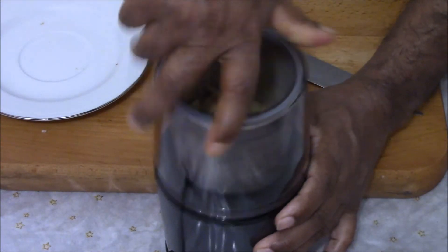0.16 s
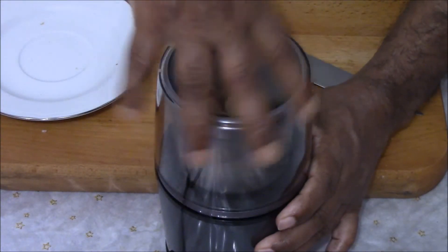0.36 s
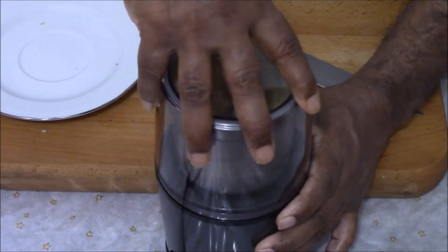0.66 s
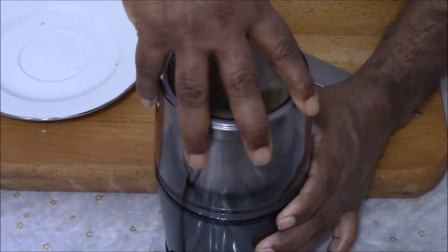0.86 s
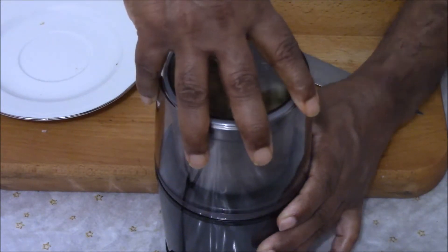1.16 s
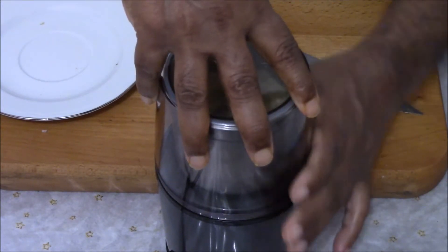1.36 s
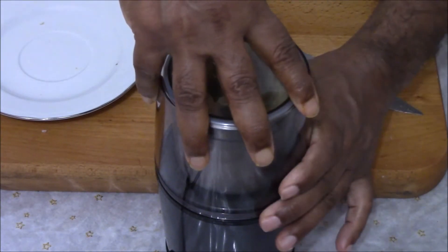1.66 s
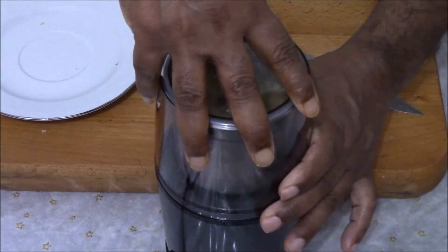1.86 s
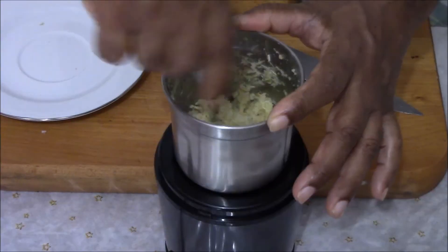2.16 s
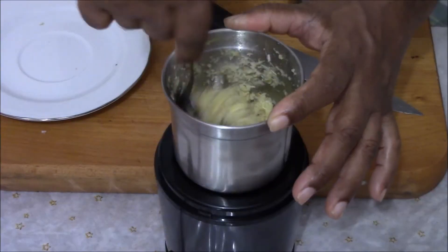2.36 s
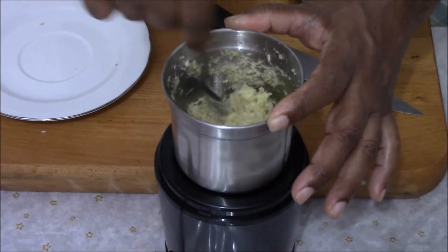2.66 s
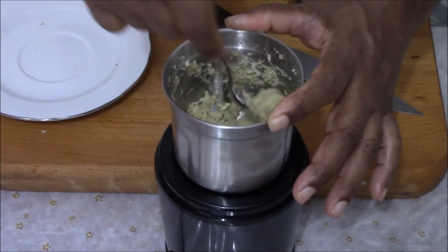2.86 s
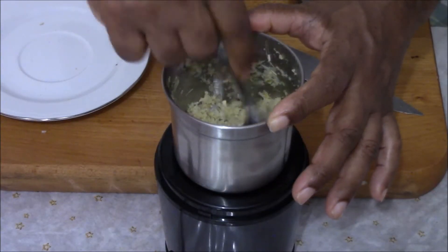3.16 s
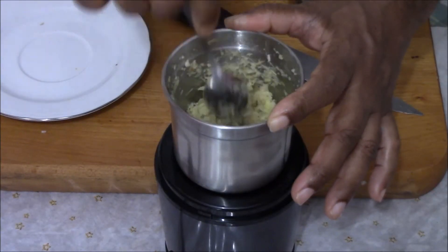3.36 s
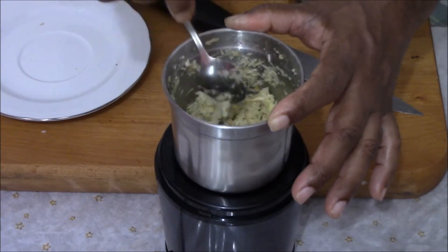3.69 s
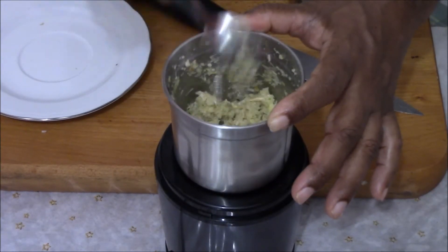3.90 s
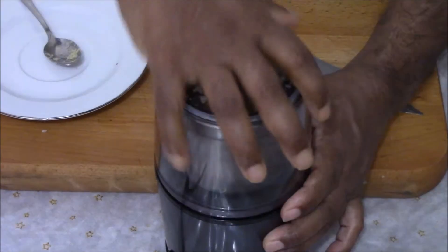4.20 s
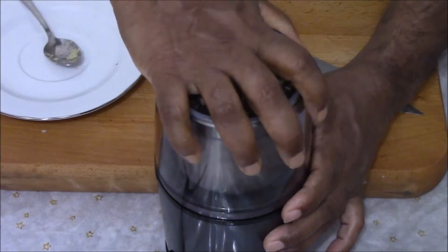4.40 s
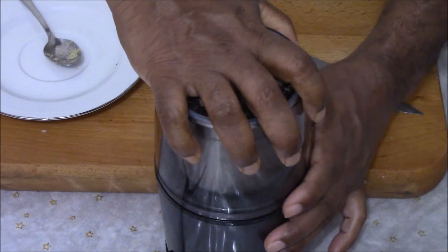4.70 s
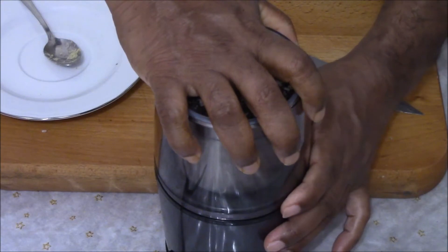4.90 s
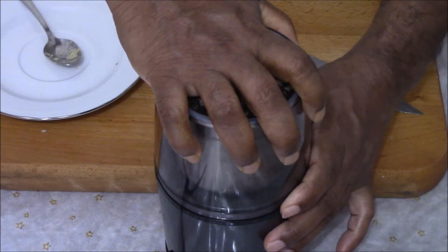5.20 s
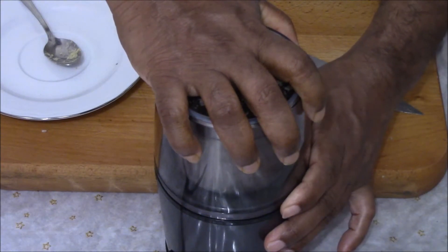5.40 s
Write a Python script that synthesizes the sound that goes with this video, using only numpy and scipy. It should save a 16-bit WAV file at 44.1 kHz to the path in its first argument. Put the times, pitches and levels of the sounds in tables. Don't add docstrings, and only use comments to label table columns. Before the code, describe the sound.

In a hard kitchen, a small electric grinder chops loudly, a spoon taps and scrapes metal, lands on a plate, then wet paste grinds quietly.

```python
import sys
import numpy as np
from scipy import signal
from scipy.fft import rfft, irfft, next_fast_len
from scipy.io import wavfile
from scipy.ndimage import uniform_filter1d, map_coordinates

SR = 44100
rng = np.random.default_rng(int(sys.argv[2]) if len(sys.argv) > 2 else 0)


def volts_from_decibels(level):
    exponent = np.asarray(level, float) / 20
    return 10 ** exponent


def materialize(psi):
    bounded = np.clip(np.atleast_2d(psi).T, -1, 1)
    quanta = np.round(bounded * 32767).astype(np.int16)
    wavfile.write(sys.argv[1], SR, quanta)


N = 244443
T = np.arange(N) / SR
TOP_HZ = 16150


def unit(x):
    return x / np.sqrt(np.mean(x ** 2) + 1e-20)


def along(points, hz):
    f, v = np.transpose(points)
    return np.interp(np.log(hz + 1), np.log(f + 1), v)


def curves(rows):
    s, *cols = np.transpose(rows)
    gate = uniform_filter1d(1. * (T > s[0]) * (T < s[-1]), size=200)
    return [np.interp(T, s, c) for c in cols] + [gate]


def wobble(rate):
    return map_coordinates(rng.standard_normal(int(N * rate / SR) + 4), [T * rate])


def filtered(x, response):
    m = next_fast_len(x.shape[-1] + SR // 4)
    return irfft(rfft(x, m) * response(np.fft.rfftfreq(m, 1 / SR)), m)[..., :x.shape[-1]]


def peak(f, hz, width):
    return 1j * f * width / (hz * hz - f * f + 1j * f * width)


def ringing(x, modes, spectrum, lo, hi, between_db):
    middle_db = along(spectrum, np.sqrt(lo * hi))

    def response(f):
        edge = 1 / np.sqrt((1 + (lo / (f + 1)) ** 12) * (1 + (f / hi) ** 12))
        lines = sum(volts_from_decibels(db) * peak(f, hz, max(w, hz / 60)) for hz, w, db in modes)
        return edge * (lines + volts_from_decibels(between_db + along(spectrum, f) - middle_db))

    return unit(filtered(x, response))


def grit(per_second, spread_db, share):
    draw = rng.random(N)
    sizes = volts_from_decibels(spread_db * rng.standard_normal(N)) * rng.choice([-1, 1], N)
    hits = (draw < per_second / SR) * sizes
    share = np.clip(share, 0, 1)
    return np.sqrt(1 - share) * rng.standard_normal(N) + np.sqrt(share) * unit(hits)


def ping(t, hz, db, t60):
    drift = 0.079 * np.cumsum(rng.standard_normal(len(t)))
    return volts_from_decibels(db - 60 * t / t60) * np.sin(2 * np.pi * hz * t + drift)


def add(track, s, sound):
    track[round(s * SR):][:len(sound)] += sound


def stroke(s, db, rise, t60):
    return volts_from_decibels(db - 60 * np.clip(T - s, 0, 2) / t60) * np.clip(1 + (T - s) / rise, 0, 1) ** 2


def strokes(rows):
    return [sum(stroke(s, db + lean * bright, rise, t60) for s, db, rise, t60, bright in rows)
            for lean in (-1, 0, 1)]


# [f/Hz, level/dB]
AIR_MID = [(15, -69), (25, -41), (97, -19), (170, -11.5), (256, -8), (293, -7), (695, -16), (863, -21),
           (8590, -41.5), (16000, -48)]
AIR_SIDE = [(15, -48), (25, -11), (373, -4.5), (818, -15), (3250, -26), (3720, -27.5), (8590, -33),
            (16000, -45)]


def room_tone(level_db):
    air = [unit(filtered(rng.standard_normal(N), lambda f: volts_from_decibels(along(colour, f))))
           for colour in (AIR_MID, AIR_SIDE)]
    return air * volts_from_decibels(level_db + 1.4 * wobble(10.0) + [[0], [-11]])


# [f/Hz, t60/s]
KITCHEN = [(150, 0.52), (1000, 0.55), (4000, 0.47), (8000, 0.36), (14000, 0.18)]


def kitchen(x):
    hz, t, z = signal.stft(rng.standard_normal((2, SR)), SR, nperseg=256)
    tail = signal.istft(z * volts_from_decibels(-60 * t / along(KITCHEN, hz)[:, None]), SR, nperseg=256)[1]
    delayed = np.pad(x, (300, 0))[None]
    return signal.fftconvolve(delayed, tail / np.linalg.norm(tail[0]), axes=1)[:, :len(x)]


# [t/s, peak level/dB, rise/s, t60/s, brightness/dB]
HANDLING = [
    (0.02, -21, 0.09, 0.43, 2.5),
    (0.13, -23, 0.074, 0.29, -8),
    (0.342, -19, 0.0094, 0.14, -5),
    (0.405, -21.5, 0.015, 0.27, 0.5),
    (0.448, -11.5, 0.017, 0.11, 3.5),
]
# [t/s, peak level/dB, click f/Hz, rim level/dB]
CLICKS = [(0.034, -10, 3360, -14), (0.087, -10, 2540, 3.5), (0.113, -10.5, 2370, -1),
          (0.13, -17, 2600, -30), (0.337, -28, 2660, -41), (0.3434, -29, 2560, -34),
          (0.396, -46, 2810, -14), (0.4208, -9, 2900, -9), (0.451, -5, 3760, -21),
          (4.2016, -16.5, 3290, -16), (4.2074, -17, 3130, -31), (4.2251, -19, 3480, -28)]
# [t/s, shell level/dB, thud level/dB]
KNOCKS = [
    (0.035, -27, -13),
    (0.086, -27, -21),
    (0.1287, -23, -13),
    (0.3407, -20.5, -44),
    (0.396, -24, -15),
    (0.4198, -24, -20),
    (0.45, -6.5, -25),
    (4.2264, -23, -22),
]


def fit_lid():
    out, t = np.zeros(N + SR), np.arange(SR // 8) / SR
    for s, db, hz, rim_db in CLICKS:
        contact = volts_from_decibels(-60 * t / 0.019) * (1 - np.exp(-t / 0.00011)) * rng.standard_normal(len(t))
        click = filtered(contact, lambda f: peak(f, hz, 260) + volts_from_decibels(rim_db - 9.0) * peak(f, 7730, 980)
                         + volts_from_decibels(-33) * peak(f, 5000, 12000))
        add(out, s, volts_from_decibels(db) * click / np.abs(click).max())
    for s, shell_db, thud_db in KNOCKS:
        thud = ping(t, 293.0, thud_db - 4.0, 0.088) * (1 - np.exp(-t / 0.0071))
        add(out, s, ping(t, 1068, shell_db, 0.076) + thud)
    pushing, _, sliding = strokes(HANDLING)
    noise = rng.standard_normal(N)
    rumble = pushing * volts_from_decibels(-7.5) * ringing(noise, BODY, AIR_MID, 120, 1800, between_db=-27)
    rasp = ringing(grit(340, 14.0, 0.45), SHELL, CHOP_COARSE, lo=1940, hi=16000, between_db=5)
    return out[:N] + rumble + sliding * volts_from_decibels(-12.0) * rasp


# [f/Hz, width/Hz, level/dB]
BODY = [(103, 8.9, -4.5), (148.9, 4.5, 6), (200, 45, -1), (254.6, 30, -5.5), (278.3, 11, 0.5),
        (330.8, 11.8, 3.5), (387.5, 8.8, -2.5), (636, 58, -20)]
# [f/Hz, width/Hz, level/dB]
SHELL = [(824, 23, -22), (997, 12, -7), (1082, 25, -5), (1297, 18, -5.5), (1428, 64, -6), (1520, 43, -9),
         (1637, 47, -7), (2044, 80, -8.5), (2477, 40, -3.5)]
PULPED_S, PULPING_S, DULLED_DB, SLAP_DB = 1.52, 0.032, 6, -8


def grinder(rows, chop, wall, grains, rough_db, between_db, cup_db, spray_db, finer_db_per_s, lumps_db):
    body_db, flying_db, on = curves(rows)
    finer_db = finer_db_per_s * (T - rows[0][0]) * on
    pulp = 1 / (1 + np.exp(np.clip((PULPED_S - T) / PULPING_S, -50, 50)))
    slap = ringing(rng.standard_normal(N), BODY, chop, lo=430, hi=910, between_db=17)
    slap = pulp * volts_from_decibels(SLAP_DB + 3.3 * wobble(33)) * slap
    load = wobble(21.73)
    body = ringing(rng.standard_normal(N), BODY, chop, lo=99, hi=470, between_db=-7)
    body = volts_from_decibels(body_db + 0.74 * wobble(9) + rough_db * wobble(45)) * body
    shell = ringing(grit(900, 2.2, grains), SHELL, chop, lo=593, hi=2104, between_db=-4.5)
    shell = volts_from_decibels(1.0 * load + 1.6 * wobble(12)) * shell
    strikes = volts_from_decibels(lumps_db * load + 1.6 * wobble(140)) * grit(1400, 5.0, grains)
    cup = volts_from_decibels(cup_db - 0.14 * finer_db) * ringing(strikes, wall, chop, 2570, 6000, between_db)
    spray = ringing(strikes, wall, chop, 7780, 2 * TOP_HZ, between_db - 21)
    spray = volts_from_decibels(spray_db - finer_db - DULLED_DB * pulp) * spray
    return on * volts_from_decibels(-0.5) * (body + volts_from_decibels(flying_db) * (shell + slap + cup + spray))


# [t/s, housing shake level/dB, flying pieces level/dB]
COARSE = [
    (0.45, -14, -15.5),
    (0.58, -11.5, -17),
    (0.86, -13, -16),
    (1.08, -20, -15),
    (1.16, -14, -14.5),
    (1.5, -16.5, -14),
    (1.7, -21, -14),
    (1.79, -18, -17),
    (1.97, -18, -16),
]
# [f/Hz, density level/dB per Hz]
CHOP_COARSE = [(40, -48), (144, -9.5), (329, 6), (680, -14), (1440, -11), (1810, -19), (2050, -13.5),
               (3060, -22), (3650, -18.5), (4240, -26), (7730, -25.5), (16000, -39.5)]
# [f/Hz, width/Hz, level/dB]
CUP = [(3654, 150, 6), (4990, 21, -1), (5500, 250, 0), (7330, 97, 3), (7920, 77, -2), (10830, 180, -9)]


def chop_coarse():
    return grinder(COARSE, CHOP_COARSE, CUP, grains=0.58, rough_db=-0.4, between_db=4.5, cup_db=-5,
                   spray_db=-9.0, finer_db_per_s=3, lumps_db=1.83)


RIM_HZ, SAG_HZ_PER_S, RIM_DB, FADE_DB_PER_S = 3720, 110, -22, 17
# [t/s, peak level/dB]
FITS = [
    (0.624, -11.5),
    (1.25, -11),
    (1.299, -3),
    (1.34, -10.5),
    (1.539, -11),
    (1.64, -25),
]
FIT_RISE_S, FIT_T60_S = 0.012, 0.032


def singing():
    start = COARSE[0][0]
    level = stroke(start, RIM_DB, .004, 60 / FADE_DB_PER_S) * volts_from_decibels(5.7 * wobble(46.7))
    level = level + sum(stroke(s, db, FIT_RISE_S, FIT_T60_S) for s, db in FITS)
    hz = RIM_HZ - SAG_HZ_PER_S * (T - start)
    return level * np.sin(2 * np.pi * np.cumsum(hz * (1 + 0.0055 * wobble(250))) / SR)


# [t/s, f/Hz, peak level/dB, rise/s, t60/s]
DRONES = [(0.489, 103, -15, 0.035, 0.24), (0.5, 1078, -13, 0.055, 0.29), (0.51, 1400, -24, 0.053, 0.23),
          (0.51, 2013, -19, 0.043, 0.28), (0.56, 340, -8, 0.095, 0.37), (0.639, 2476, -22, 0.05, .3),
          (0.711, 1016, -18, 0.087, .5), (0.86, 340, -12.5, .08, 0.26), (0.9, 1310, -16.5, 0.073, 0.36),
          (1.17, 1435, -16.5, 0.064, 0.44), (1.18, 366, -20, .06, .3), (1.2, 1652, -17, 0.089, 0.29),
          (1.34, 1430, -21.5, 0.067, .35), (1.56, 1063, -11.5, 0.034, 0.16), (1.59, 620, -18, 0.048, 0.37),
          (1.64, 1445, -20, 0.068, 0.25), (1.74, 583, -17.5, 0.065, 0.25), (1.78, 380, -12.5, 0.073, 0.46),
          (1.79, 836, -21, 0.055, 0.23), (1.8, 103, -27, 0.11, 1), (4.38, 206, -24, 0.063, 0.24),
          (4.42, 2050, -48, 0.055, .25), (4.429, 1335, -42, .06, 0.27), (4.62, 200, -21.5, 0.3, 1),
          (4.77, 1344, -33, .08, 0.26), (4.91, 206, -26, .06, 0.29), (5.04, 1005, -28, 0.091, 0.51),
          (5.09, 1316, -25, 0.18, 0.44), (5.27, 1018, -30, 0.058, 0.52), (5.281, 340, -35, .06, 0.26),
          (5.5, 103, -30.5, 0.11, .6)]


def drones():
    out, swell, waver, t = np.zeros(N + SR), wobble(33), wobble(60), np.arange(SR) / SR
    for (s, hz, db, rise, t60), turn in zip(DRONES, rng.integers(N - SR, size=len(DRONES))):
        level_db = db - 60 * np.clip(t - rise, 0, 1) / t60 + 1.56 * swell[turn:][:SR]
        level = volts_from_decibels(level_db) * np.clip(t / rise, 0, 1) ** 2
        phase = 2 * np.pi * np.cumsum(hz + 9.5 * waver[turn:][:SR]) / SR
        add(out, s - rise, level * np.sin(phase))
    return out[:N]


# [t/s, peak level/dB]
CHUNKS = [(0.5007, -13), (0.5771, 0), (0.601, 3.5), (0.662, 5), (0.7063, 0), (0.7552, -13), (0.815, 5.5),
          (0.8755, 2), (0.9243, 5.5), (0.9996, -1), (1.0573, -3), (1.1136, 1), (1.1538, 5.5), (1.175, 2),
          (1.219, 1), (1.2468, 10), (1.294, 3), (1.334, 5.5), (1.4353, -0.5), (1.539, 9.5), (1.629, -10),
          (1.722, -10), (1.8106, -2), (1.9097, -1), (4.418, -11), (5.0838, -5.5), (5.1585, -8.5),
          (5.281, -5.5), (5.37, -5), (5.4753, -3.5)]


def chunks():
    burst = np.zeros(N + SR)
    t = np.arange(2000) / SR
    for s, db in CHUNKS:
        add(burst, s, volts_from_decibels(db - 4.5 - 60 * t / 0.021) * (1 - np.exp(-t / 0.0027)))
    return burst[:N] * ringing(rng.standard_normal(N), CUP, CHOP_COARSE, 1500, 10000, between_db=6)


# [t/s, peak level/dB, chatter t60/s, broad level/dB]
TAPS = [
    [(2.043, -8, 0.013, 2)],
    [(2.057, -1, 0.014, -9.5), (2.156, -4.5, 0.023, 4.5)],
    [(2.498, -0.5, 0.21, -1), (2.549, -10.5, 0.18, 23)],
    [(2.673, -12, 0.1, -9)],
    [(2.96, 1, 0.16, -1), (2.977, -3.5, 0.39, 13)],
    [(3.364, -1, 0.042, 6)],
]
# [f/Hz, width/Hz, level/dB]
SPOTS = [
    [(890, 38, 0), (7000, 310, -2.5), (9500, 160, 0), (10900, 220, 3)],
    [(290, 67, -14.5), (803, 68, -1), (893, 69, 1), (1590, 98, -11), (2580, 98, -24), (4160, 175, -11.5),
     (9130, 130, -14)],
    [(1040, 70, -8), (2410, 43, -9.5), (2930, 26, -3.5), (3300, 110, -11.5), (3750, 37, 2.5),
     (4300, 96, -22), (5070, 30, -9), (5800, 30, -10), (6350, 68, -4), (7620, 60, -8), (8200, 76, -10),
     (9800, 160, -14)],
    [(910, 59, 0), (2220, 60, -8), (2890, 41, -5), (3700, 200, -10.5), (4260, 90, -3), (5450, 84, -10.5),
     (6070, 67, -7), (7600, 140, -2), (10300, 270, -6)],
    [(1075, 34, -1), (2170, 60, -5), (2890, 29, -4.5), (3780, 68, -1.5), (3950, 60, -3), (4400, 36, -3.5),
     (4770, 44, -10), (5770, 100, 1.5), (6380, 57, 0.5), (6650, 40, -1), (7000, 77, -5), (7560, 84, -0.5),
     (8170, 45, -4.5), (9900, 150, -5)],
    [(1077, 30, -7), (1544, 24, -5.5), (2000, 27, -20), (2450, 65, -6), (2930, 39, -1), (4070, 92, -1),
     (4750, 90, -5), (5450, 110, -10.5), (6170, 100, -5), (6640, 55, -7), (7150, 220, -7.5), (9840, 93, -8),
     (10200, 130, -12)],
]
# [t/s, peak level/dB]
TICKS = [
    (2.6252, -30),
    (2.7474, -31),
    (2.8008, -41),
    (3.178, -40),
]
# [t/s, peak level/dB, thud level/dB]
CLINKS = [
    (3.9622, 4.5, -26),
    (4.123, 4.5, -23.5),
]
# [f/Hz, level/dB, t60/s]
CHINA = [(3740, -13, 5.0), (3930, -2, 0.053), (5500, -27, 0.11), (4930, -14, 5.0), (6400, -20, 0.18),
         (7800, -26, 0.5), (7870, 1.5, 0.011), (9860, -16, 0.022)]
WIDEN, LOUDEST_DB, BLOW = 2.3, 3, 9


def spoon():
    out, t = np.zeros(N + SR), np.arange(SR // 4) / SR
    for taps, modes in zip(TAPS, SPOTS):
        for s, db, chatter, open_db in taps:
            decay = volts_from_decibels(-0.5 - 60 * t / 0.022) + volts_from_decibels(-8.0 - 60 * t / chatter)
            contact = decay * (1 - np.exp(-t / 0.00092)) * rng.standard_normal(len(t))
            contact[0] = BLOW

            def steel(f):
                lines = sum((-1) ** k * volts_from_decibels(min(level, LOUDEST_DB)) * peak(f, hz, WIDEN * w)
                            for k, (hz, w, level) in enumerate(modes))
                broad = volts_from_decibels(open_db - 20.5) * peak(f, 2450, 9100) * peak(f, 1940, 12400) ** 2
                return (lines + broad) / (1 + 1j * f / 14000) ** 2

            ring = filtered(contact, steel)
            add(out, s, volts_from_decibels(db + 2.5) * ring / np.abs(ring).max())
    for s, db in TICKS:
        graze = volts_from_decibels(-60 * t / 0.011) * rng.standard_normal(len(t))
        add(out, s, volts_from_decibels(db) * filtered(graze, lambda f: peak(f, 11000, 5000) ** 2))
    for s, db, thud_db in CLINKS:
        ring = sum(ping(t, hz, 0.46 * level, min(t60, .04)) for hz, level, t60 in CHINA)
        crack = volts_from_decibels(0.5 - 60 * t / 0.0052) * rng.standard_normal(len(t))
        thud = ping(t, 311, db + thud_db, 0.28) + ping(t, 689, db + thud_db, 0.066)
        add(out, s, volts_from_decibels(db - 5.0) * (ring + crack) + thud)
    return out[:N]


def friction(rows, modes, colour, low_db, top_db):
    low, middle, top = strokes(rows)
    grains = volts_from_decibels(3 * wobble(70)) * grit(2000, 3, .3)
    low = low * volts_from_decibels(low_db) * ringing(grains, modes, colour, lo=123, hi=910, between_db=-13.5)
    middle = middle * ringing(grains, modes, colour, 1200, 6600, between_db=-12)
    top = top * volts_from_decibels(top_db) * ringing(grains, modes, colour, 6500, 2 * TOP_HZ, between_db=-17)
    return volts_from_decibels(-5.0) * (low + middle + top)


# [t/s, peak level/dB, rise/s, t60/s, brightness/dB]
SCRAPE = [
    (2.066, -20, 0.011, 0.23, -8.5),
    (2.115, -18, 0.015, 0.19, 7),
    (2.135, -23, 0.023, 0.25, 1.5),
]
SLIDE = [
    (2.206, -18, 0.016, 0.14, -4),
    (2.258, -34.5, 0.04, 0.068, 14.5),
]
# [f/Hz, width/Hz, level/dB]
SCRAPE_RING = [(310, 120, 10), (787, 110, 10.5), (850, 53, 8), (2730, 85, -2), (3550, 72, -5),
               (4700, 220, -6), (7130, 61, -5), (8600, 83, -25)]
SLIDE_RING = [(870, 74, -25), (2980, 44, 2), (3700, 48, -5), (5840, 39, 0), (6440, 100, -7), (6700, 38, -5),
              (7530, 32, 2), (8740, 70, -24)]
# [f/Hz, density level/dB per Hz]
DRAG = [(47, -62), (80, -44), (303, -12), (538, -9), (858, -14), (7360, -21), (16000, -29)]


def scraping():
    scrape = friction(SCRAPE, SCRAPE_RING, DRAG, low_db=2.0, top_db=-10.0)
    return scrape + friction(SLIDE, SLIDE_RING, DRAG, low_db=-12.0, top_db=-6.5)


# [t/s, peak level/dB, rise/s, t60/s, brightness/dB]
RATTLE = [
    (3.968, -18.5, 0.0023, 0.13, -2),
    (4.003, -14, 0.044, 0.21, 1.5),
    (4.035, -17, 0.077, 0.42, -3),
]
# [f/Hz, width/Hz, level/dB]
RATTLE_RING = [(200, 32, -7), (285, 83, -2), (670, 91, -3), (1930, 81, -10), (3430, 140, -7),
               (3950, 67, -15), (4220, 60, -5), (4940, 68, -11), (5500, 60, -11), (6300, 100, -1),
               (7520, 130, 0), (9740, 120, -12), (10500, 100, -15)]
# [f/Hz, density level/dB per Hz]
RUB = [(47, -58), (80, -26), (199, -14), (687, -39), (1170, -35.5), (3960, -6), (10000, -29), (15000, -54)]


def rattling():
    return friction(RATTLE, RATTLE_RING, RUB, low_db=-1.5, top_db=-6)


# [t/s, housing shake level/dB, flying pieces level/dB]
PASTE = [
    (4.222, -21, -33),
    (4.32, -35.5, -34.5),
    (4.39, -25, -30.5),
    (4.66, -28.5, -29),
    (4.85, -26, -27),
    (5.1, -25.5, -25.5),
    (5.3, -23, -24),
    (5.43, -27.5, -23.5),
    (5.55, -22.5, -24),
]
# [f/Hz, density level/dB per Hz]
CHOP_PASTE = [(40, -49), (91, -16), (204, 22.5), (329, 6.5), (491, -13.5), (831, -22.5), (1340, -20.5),
              (1850, -26.5), (3300, -16.5), (6650, -25), (9690, -29.5), (16000, -42.5)]
# [f/Hz, width/Hz, level/dB]
COATED = [(2650, 65, 6), (3290, 98, 4), (3650, 59, 3), (4750, 150, -9), (5720, 120, 0), (7140, 160, -8),
          (11500, 410, -19)]


def grind_paste():
    return grinder(PASTE, CHOP_PASTE, COATED, grains=0.35, rough_db=-1.0, between_db=0.5, cup_db=-4.0,
                   spray_db=-5.0, finer_db_per_s=3.0, lumps_db=1.35)


# [t/s, f/Hz]
WHINE = [(4.3, 3550), (4.5, 3780), (4.65, 4100), (4.8, 4500), (5.0, 4770), (5.12, 4870), (5.27, 4830),
         (5.36, 4700), (5.55, 4750)]
WHINE_DB, FULL_HZ, WHINE_DB_PER_OCTAVE = -47.5, 4850, 9


def whine():
    hz, on = curves(WHINE)
    turn = 2 * np.pi * np.cumsum(hz * (1 + 0.0038 * wobble(300))) / SR
    level_db = WHINE_DB + WHINE_DB_PER_OCTAVE * np.log2(hz / FULL_HZ)
    overtones = sum(volts_from_decibels(level + 1.8 * wobble(30)) * np.sin(order * turn)
                    for order, level in [(2, -2), (2.5, -14), (3, -9)])
    return on * np.sqrt(2) * volts_from_decibels(level_db) * overtones


SPLICES = [0, 1.9672, 4.137, 4.162, 4.2, 6]
HUSH_DB = [-40, -40.5, -54, -56, -46.5]
# [f/Hz, side minus mid level/dB]
APART = [(60, -72), (200, -31.5), (700, -25.5), (2500, -25), (5000, -22.5), (10000, -25.5), (15000, -23)]


def scene():
    thrown, fitting, nothing = chunks() + drones(), fit_lid(), np.zeros(N)
    first = chop_coarse() + thrown + singing()
    second = grind_paste() + thrown + whine()
    stirring = spoon() + scraping() + rattling()
    parts = [(first, fitting), (nothing, stirring), (nothing, volts_from_decibels(-48) * stirring),
             (nothing, nothing), (second, fitting)]
    pair, tone_db = np.zeros((2, N)), np.zeros(N)
    for (run, knocks), db, start, end in zip(parts, HUSH_DB, SPLICES, SPLICES[1:]):
        part = slice(round(start * SR), round(end * SR))
        wet = kitchen((volts_from_decibels(-10) * knocks + volts_from_decibels(-10.5) * run)[part])
        pair[:, part] = wet * volts_from_decibels([[0], [8.5]]) + (knocks + run)[part] * [[1], [0]]
        tone_db[part] = db
    pair = signal.sosfilt(signal.butter(4, 85, "high", fs=SR, output="sos"), pair)
    pair[1] = filtered(pair[1], lambda f: volts_from_decibels(5.5 + along(APART, f)))
    mid, side = pair + room_tone(tone_db)
    return np.array([mid + side, mid - side])


def thin_side(pair, keep_db, chance_db):
    both = np.array([pair[0] + pair[1], pair[0] - pair[1]]) / 2
    mid, side = signal.stft(both, nperseg=1024)[2]

    def cell(z):
        return uniform_filter1d(uniform_filter1d(z, size=12, axis=0), size=3, axis=1)

    luck = volts_from_decibels(chance_db * unit(cell(rng.standard_normal(mid.shape))))
    heard = cell(np.abs(side)) * luck > volts_from_decibels(keep_db) * cell(np.abs(mid))
    kept = signal.istft(side * heard, nperseg=1024)[1][:N]
    return both[0] + kept * [[1], [-1]]


def band_limit(x):
    return signal.sosfilt(signal.butter(12, 16250, fs=SR, output="sos"), x)


def record(dry):
    capped = dry / (1 + np.abs(dry / 0.85) ** 6) ** (1 / 6)
    limited = filtered(capped, lambda f: np.clip((TOP_HZ - f) / 700, 0, 1) ** 2)
    mix = thin_side(limited, keep_db=-18, chance_db=5)
    return band_limit(mix)


dry = scene()
out = record(dry)
materialize(out)
```